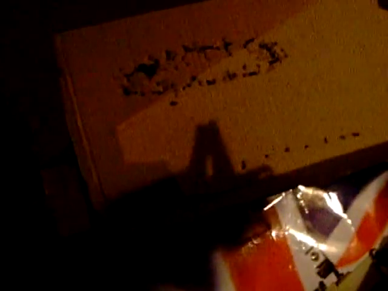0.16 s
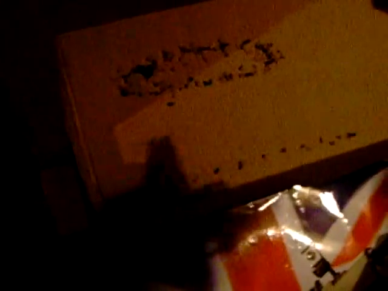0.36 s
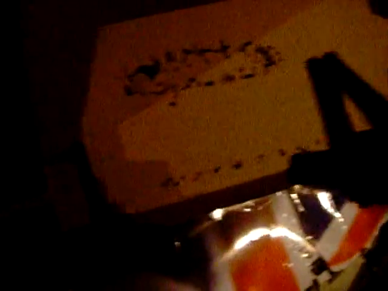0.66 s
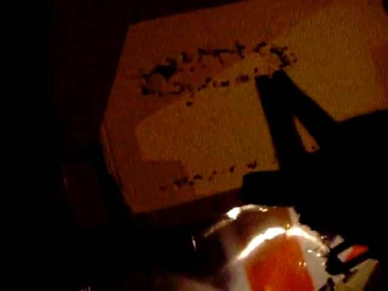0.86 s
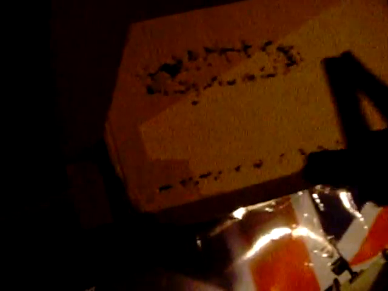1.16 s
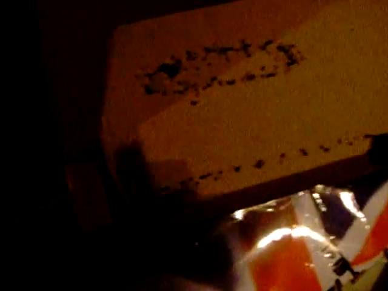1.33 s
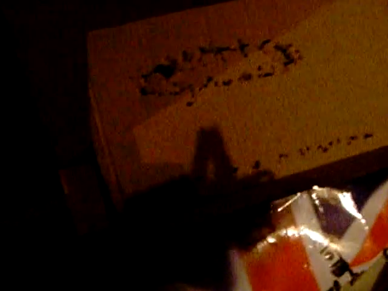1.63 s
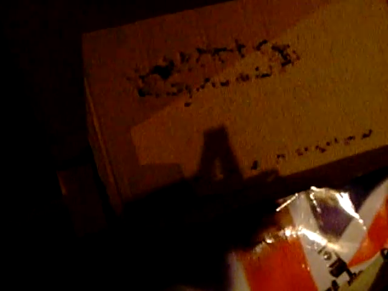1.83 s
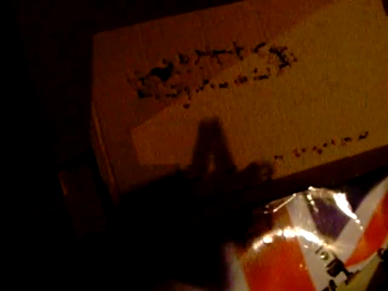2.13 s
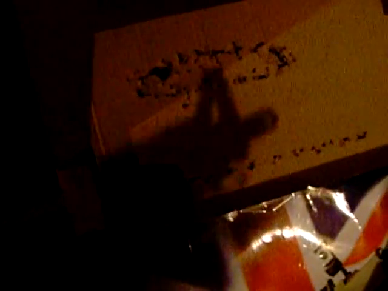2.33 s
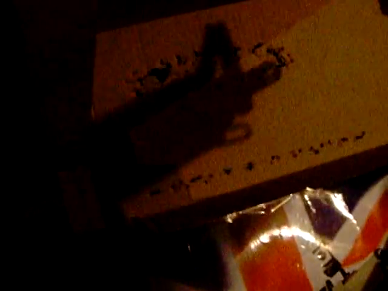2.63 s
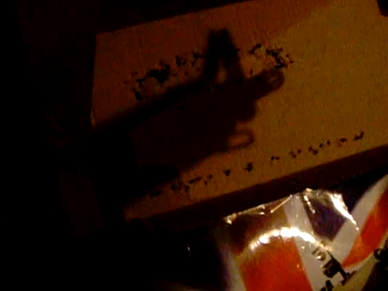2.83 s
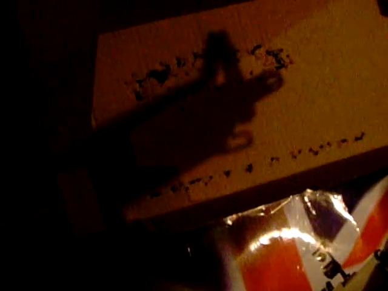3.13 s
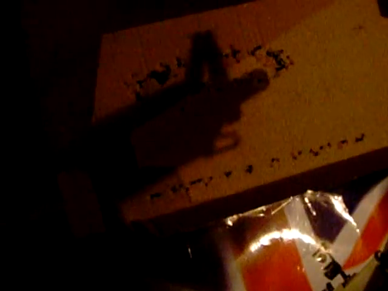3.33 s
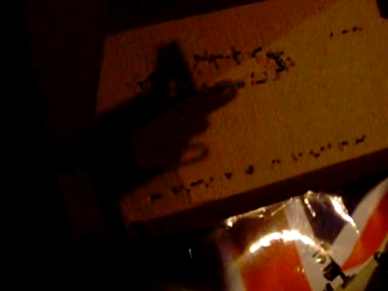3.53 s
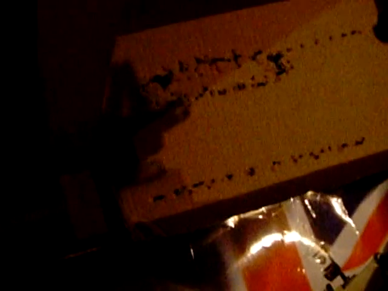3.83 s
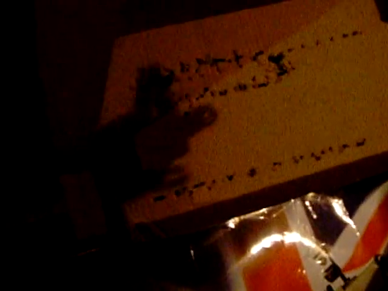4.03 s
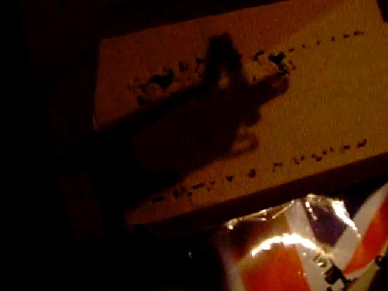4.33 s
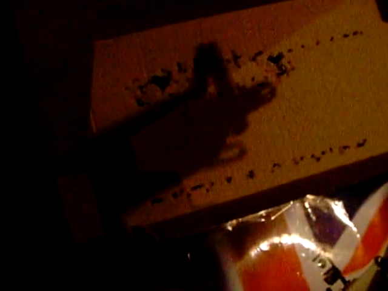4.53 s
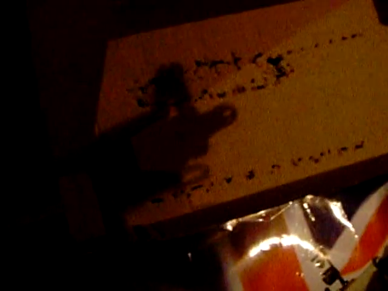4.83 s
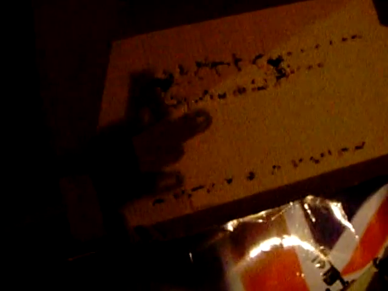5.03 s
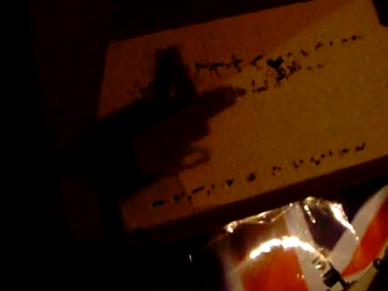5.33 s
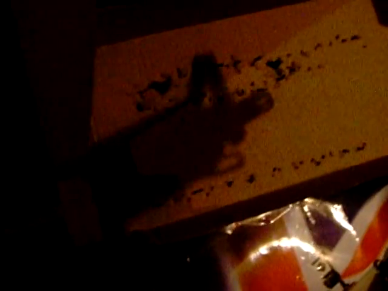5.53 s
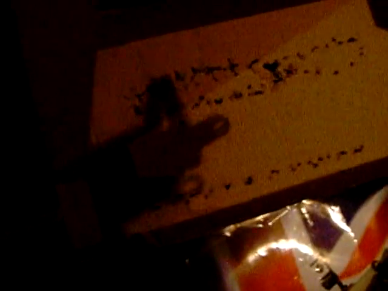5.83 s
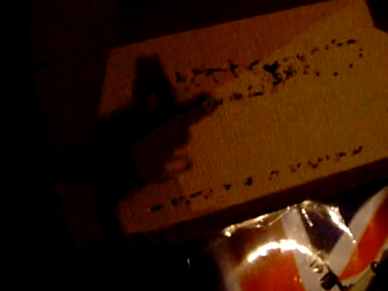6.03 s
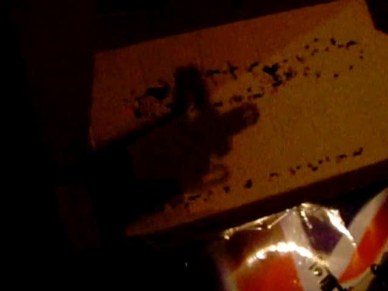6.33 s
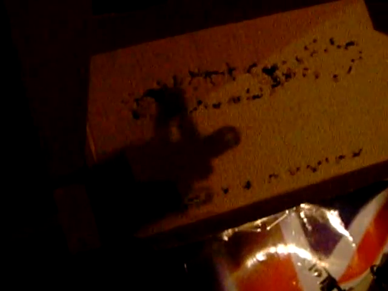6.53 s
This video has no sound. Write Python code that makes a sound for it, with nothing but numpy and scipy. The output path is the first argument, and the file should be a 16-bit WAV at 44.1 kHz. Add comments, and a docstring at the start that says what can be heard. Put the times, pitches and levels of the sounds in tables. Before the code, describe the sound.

In a small room, with the microphone right beside the gun, an electric airsoft rifle is already running. From 0 to about 2.1 seconds it fires steadily, about fourteen shots a second: a continuous raspy gear grind with a slight whine, hard piston clacks, thumping air puffs and pellets smacking a cardboard box, some shots harder than others. The loudness overloads the microphone, adding bright crackly ticks. The motor stops abruptly; a thin, beating metallic spring ring dies away by roughly 2.7, leaving faint room noise, a slight rustle and tiny clicks. At 3.4 a brief squeal starts a second, punchier burst, ending near 4.2. Until 5.0 hands rub the stock and parts click, loudest at 4.23, 4.6 and 5.0. Rising gear squeals then launch the third burst, which slows very slightly and continues to the end at about 6.8 seconds.

```python
"""An electric airsoft rifle, its motor already turning, fires into a cardboard box in a small room, by the
microphone. Gears rasp as a chain of noisy tooth contacts; some 14 times a second air puffs out, the piston
slams and a pellet hits the card, each contact a decaying band of noise. After the first burst the spring rings
on as decaying sines. Hands rustle and parts click, then two more bursts start with gear squeals that follow the
rising tooth rate. A quiet background lies beneath throughout; stray pellets tick short and bright at random,
and the loud bursts overload the microphone."""
import sys
import numpy as np
from scipy import signal
from scipy.fft import rfft, irfft, next_fast_len
from scipy.io import wavfile

SR = 44100
rng = np.random.default_rng(int(sys.argv[2]) if len(sys.argv) > 2 else 0)


def to_wav(s):
    """Save 16-bit WAV."""
    ch = np.atleast_2d(s).T  # columns
    pcm = np.round(np.clip(ch, -1, 1) * 32767)  # PCM
    wavfile.write(sys.argv[1], SR, pcm.astype(np.int16))


N = 294147

# Bursts of fire: trigger pulled t/s, first shot t/s, released t/s, cycle t/s, coasting to -60 dB t/s,
# ordinary blow level/dB, ring of the spring after the last shot level/dB
BURST_TIMES = [(-.2, 0.038, 2.075, .06876, 0.16, -2.6, 4), (3.377, 3.4184, 4.168, .0704, 0.1, -1, -13),
               (5.007, 5.0983, 6.8, .072, .1, -2.5, -7)]


def from_db(db):
    """Level definition: a gain is ten to the power of dB / 20."""
    return 10 ** (np.asarray(db) / 20)


def rms_one(x):
    """Normalisation by mean power: scale to rms 1."""
    return x / np.sqrt(np.mean(x ** 2) + 1e-20)


def decay(t, t60):
    """Exponential damping: the amplitude falls by 60 dB in t60."""
    return np.exp(-np.log(1000) * t / t60)


def lowpass(x, hz, order):
    """Butterworth filtering: only what lies below hz passes freely."""
    return signal.sosfilt(signal.butter(order, hz, fs=SR, output="sos"), x)


def highpass(x, hz):
    """Butterworth filtering: only what lies above hz passes freely."""
    return signal.sosfilt(signal.butter(2, hz, "high", fs=SR, output="sos"), x)


def colour(x, points):
    """Minimum-phase filtering: a folded cepstrum gives a causal response through (f/Hz, level/dB) points."""
    size = 2 * next_fast_len(N)
    hz, db = np.transpose(points)
    bins_hz = np.arange(size // 2 + 1) * SR / size
    gain = from_db(np.interp(np.log(bins_hz + 1), np.log(hz), db))
    cepstrum = irfft(np.log(gain))
    cepstrum[1:size // 2] *= 2
    cepstrum[size // 2 + 1:] = 0
    return irfft(rfft(x, size) * np.exp(rfft(cepstrum)))[:N]


def drift(hz):
    """Band-limited chance: noise below hz with standard deviation 1."""
    return rms_one(lowpass(rng.standard_normal(N + SR), hz, order=2)[SR:])  # without the filter's start


def burst(hz, width_hz, t60, size=8000):
    """Modal overlap: a blow on many close modes sounds as a band of noise that dies away."""
    low = np.sqrt(hz ** 2 + width_hz ** 2 / 4) - width_hz / 2  # hz is the geometric centre
    high = min(low + width_hz, SR / 2 - 100)
    band = signal.butter(2, [low, high], "band", fs=SR, output="sos")
    fade = decay(np.arange(size) / SR, t60)
    ring = signal.sosfilt(band, rng.standard_normal(size) * fade)
    return rms_one(ring) * np.sqrt(np.mean(fade ** 2))


def add(out, s, sound):
    """Superposition: mix a sound in at time s."""
    at = int(np.clip(round(s * SR), 0, N))
    out[at:at + len(sound)] += sound[:N - at]


def shots():
    """Near-periodic firing: a steady cycle falls behind as the battery sags, with chance strengths.

    Each row is a shot: t/s, blow level/dB, puff level/dB."""
    # Shots that stand out, by a hard hit or an air blast that catches the microphone:
    # t/s, blow level/dB, puff level/dB
    hard_shots = [(.312, -6, 4), (.589, -2, 7), (.797, -0.5, 5.5), (1.146, 1, 5), (1.29, 1, 5.5),
                  (1.435, 2.5, 5.5), (2.047, -1, 3), (3.631, 2, -2), (3.702, 5, 9), (3.771, 4.5, 4),
                  (3.84, 2.5, -6), (5.245, 0.5, 7), (5.53, 3.5, 7.5), (5.678, 4, 5), (6.19, 3, 9),
                  (6.414, 2.5, 0)]
    sag_s_per_s4 = .0062  # delay per fourth power of the time spent firing
    blow_spread_db, puff_db, puff_spread_db = 1, -3.5, 2.5  # ordinary shots
    rows = []
    for pulled, first, released, cycle, coast, blow_db, spring_db in BURST_TIMES:
        age = cycle * np.arange(32)
        times = first + age + sag_s_per_s4 * age ** 4
        for s, (blow, puff) in zip(times, rng.standard_normal((32, 2))):
            hard = [levels for at, *levels in hard_shots if abs(at - s) < cycle / 2]
            ordinary = blow_db + blow_spread_db * blow, puff_db + puff_spread_db * puff
            if s < min(released, N / SR):
                rows.append((s, *(hard[0] if hard else ordinary)))
    return np.array(rows)


def motor_db():
    """Rotational inertia: drive builds up after the trigger pull; on release friction stops it, ever faster."""
    spin_up_s = 0.033  # time constant
    now, drive = np.arange(N) / SR, 1e-6
    for pulled, first, released, cycle, coast, *levels in BURST_TIMES:
        run_up = 1 - np.exp(-np.maximum(now - pulled, 0) / spin_up_s)
        late = np.maximum(now - released, 0)
        drive = drive + run_up * decay((late / coast) ** 2, t60=1)
    return 20 * np.log10(drive)


def background():
    """Stationary noise: the quiet room is noise with a fixed spectrum."""
    # Room spectrum, relative: f/Hz, level/dB per Hz
    floor_colour = [(25, 4), (55, 2), (120, 2.5), (200, -2), (600, 1.5), (1000, -6), (2400, -9),
                    (4000, -15), (7500, -28.5), (12000, -49.5)]
    floor_db = -58
    return from_db(floor_db) * rms_one(colour(rng.standard_normal(N), floor_colour))


def gears(fired, level_db, alike, grain_db, clump_db, slack_db, slack_at_s, slack_s,
          whine_db, whine_width_hz, dull_hz, dulling):
    """Contact noise: teeth grind in a partly repeating pattern, and run slack once the piston is let go."""
    # Gear rasp, relative: f/Hz, level/dB per Hz
    rasp_colour = [(30, -20.5), (70, -6), (150, -7.5), (280, -2), (480, 1), (760, 0), (1130, 1), (1550, -2),
                   (2400, -2.5), (3300, -3.5), (4100, -2.5), (5500, -11.5), (7600, -22), (12000, -29)]
    # Gear whine, which slows as the spring is drawn: t/s after the shot, f/Hz
    whine_glide = [(0, 2875), (.025, 2750), (.048, 2400), (.06, 2160), (.08, 2200)]
    shell_hz, shell_q, shell_db = 1120, 10, -6.5  # main resonance of the gearbox shell
    times, now = fired[:, 0], np.arange(N) / SR
    shot = np.maximum(np.searchsorted(times, now) - 1, 0)
    since = now - times[shot]
    period = np.median(np.diff(times))
    speed = period / np.clip(np.diff(times, append=now[-1]), .06, .09)[shot]
    drive_db = motor_db()

    # one row of teeth is replayed every cycle, the other is always new
    teeth = rng.standard_normal((2, N)) * from_db(grain_db * rng.standard_normal((2, N)))
    repeated = teeth[0, (since * speed * SR).astype(int)]
    alike = np.clip(alike, 0, 1)
    rasp = np.sqrt(alike) * repeated + np.sqrt(1 - alike) * teeth[1]
    rasp = colour(rasp * from_db(clump_db * drift(hz=200)), rasp_colour)
    shell = signal.lfilter(*signal.iirpeak(shell_hz, shell_q, fs=SR), rasp)
    rasp = rms_one(rasp + from_db(shell_db) * shell)

    # slow teeth meet softly, so the treble comes last
    dull = lowpass(rasp, dull_hz, order=1)
    rasp = dull + (rasp - dull) * from_db(dulling * np.minimum(drive_db, 0))

    whine_hz = np.interp(since, *np.transpose(whine_glide))
    whine = drift(whine_width_hz) * np.sin(2 * np.pi * np.cumsum(whine_hz) / SR)
    slack = slack_db * np.exp(-((since - slack_at_s) / slack_s) ** 2)
    return from_db(level_db + drive_db + slack) * (rasp + from_db(whine_db) * whine)


def room(x):
    """Diffuse reverberation: dense reflections from near walls decay exponentially."""
    t60 = .31
    t = np.arange(SR // 2) / SR
    tail = rng.standard_normal(len(t)) * decay(t, t60) * (t > .005)
    tail = highpass(tail, 150)
    return signal.fftconvolve(x, tail / np.sqrt(np.sum(tail ** 2)))[:N]


def buffeting(level_db, gust_hz):
    """Turbulent pressure: stirred air keeps rocking the diaphragm while the gun runs at full speed."""
    return from_db(level_db + 2 * motor_db()) * drift(gust_hz)


def ricochets(per_s, level_db, spread_db, hz, width_hz, t60):
    """Ricochets: stray pellets tick short and bright at random while the gun fires."""
    out, drive_db = np.zeros(N), motor_db()
    for at in np.flatnonzero((rng.random(N) < per_s / SR) & (drive_db > -3)):
        gain = from_db(level_db + spread_db * rng.uniform(-1, 1))
        add(out, at / SR, gain * burst(hz, width_hz, t60))
    return out


def puffs(fired, push_db, push_s, push_spread, thump_db, thump_hz, thump_width_hz, thump_t60):
    """Air displacement: muzzle air gives the diaphragm a slow push and a low thump."""
    out, t = np.zeros(N), np.arange(SR // 6) / SR
    push = (t / push_s) ** 2 * np.exp(2 - 2 * t / push_s)  # peaks at 1 after push_s
    for s, blow_db, puff_db in fired:
        add(out, s - .006, -from_db(push_db + push_spread * puff_db) * push)
        thump = burst(thump_hz, thump_width_hz, thump_t60)
        add(out, s - .003, from_db(thump_db + puff_db) * thump)
    return out


def blows(fired, level_db, alike):
    """Impact excitation: every cycle repeats the same contacts, each ringing partly as before, partly anew."""
    # Contacts of one firing cycle, in turn: piston slips off the gear (2 rows), slams into the
    # cylinder head (2), pellet hits the cardboard (2), nozzle springs back, gear catches the piston (2):
    # t/s after the shot, f/Hz, width f/Hz, relative level/dB, t60/s
    contacts = [(-.003, 3400, 761, -4.5, 0.023), (-.003, 4800, 1598, -13.5, 0.033),
                (.002, 1150, 350, 0.5, 0.019), (.002, 540, 260, -1.5, 0.028), (.014, 820, 596, -2.5, .07),
                (0.022, 400, 300, -11, .08), (.029, 1130, 450, -10.5, .05), (.045, 2300, 800, -6, 0.015),
                (.056, 520, 299.3, -6.5, 0.025)]
    out, alike = np.zeros(N), np.clip(alike, 0, 1)
    for delay, hz, width_hz, db, t60 in contacts:
        usual = burst(hz, width_hz, t60)
        for s, blow_db, puff_db in fired:
            ring = np.sqrt(alike) * usual + np.sqrt(1 - alike) * burst(hz, width_hz, t60)
            add(out, s + delay, from_db(level_db + db + blow_db) * ring)
    return out


def spring(fired):
    """Modal decay: each release rings the spring; left free, it later settles against its damping guide."""
    # Spring modes, with close pairs that beat: f/Hz, relative level/dB, t60/s
    modes = [(921, -55, .9), (1171, -37, .8), (1180, -47, .6), (1448, -39, .6), (1492, -42, .6),
             (2037, -43, .7), (2347, -46, 1.25), (3214, -51, .7), (3838, -51, .85), (3870, -51, .85)]
    firing_db = -3.5  # ring between shots
    shimmer_db = -47  # the many weak modes
    free_s, settle_t60 = 0.38, .16
    out, t = np.zeros(N), np.arange(SR) / SR
    ring = sum(from_db(db) * np.sin(2 * np.pi * hz * t) * decay(t, t60) for hz, db, t60 in modes)
    ring = ring + from_db(shimmer_db) * burst(hz=2300, width_hz=3000, t60=0.7, size=SR)
    ring = ring * decay(np.maximum(t - free_s, 0), settle_t60)
    times = fired[:, 0]
    last_db = {times[times < released].max(): spring_db
               for pulled, first, released, *others, spring_db in BURST_TIMES}
    for s in times:
        at = int(s * SR)
        # cocking stops the previous ring, so it is replaced
        out[at:at + SR] = from_db(last_db.get(s, firing_db)) * ring[:N - at]
    return out


def handling(relative_width=0.27, lumpy_db=3.0, lumps_hz=45, tick_db=-8):
    """Friction and impact: hands rub unevenly on the stock and loose parts click; soft contacts lose their tick."""
    # Hands rubbing on the stock: start t/s, end t/s, level/dB
    rubs = [(2.559, 3.351, -67), (2.65, 2.758, -56.5), (4.217, 4.676, -45), (4.685, 4.87, -49.5),
            (4.913, 5.05, -52.5)]
    # Rustle of the hands, relative: f/Hz, level/dB per Hz
    rustle_colour = [(30, -14.5), (110, -7), (250, 3.5), (480, 8), (780, 2.5), (950, 1), (1250, -4),
                     (2000, -14), (2380, -4), (2800, -14.5), (3700, -14.5), (6000, -28), (12000, -54)]
    # Clicks of the trigger, latch and loose parts: t/s, own pitch f/Hz, body level/dB, pitch level/dB,
    # treble level/dB, t60/s, rise t/s
    clicks = [(2.582, 3220, -68, -53, -95, .07, .002), (3.25, 2600, -58, -57, -72, .05, .001),
              (4.233, 1150, -15.5, -13, -56, 0.033, 0.0013), (4.295, 1540, -53, -44, -48, .067, .004),
              (4.307, 6000, -41, -40, -55, .01, .0002), (4.4, 1090, -45, -35, -79, .064, .0003),
              (4.464, 2400, -46, -55, -76, .075, .001), (4.517, 1650, -35, -34, -75, 0.11, .0007),
              (4.606, 2580, -23, -32, -46, .12, 0.0067), (4.685, 1220, -38, -37, -74, .05, .0004),
              (4.703, 3350, -44, -40, -81, .1, .002), (4.785, 1900, -45.5, -43, -86, 0.074, .0004),
              (4.854, 1230, -51, -44, -63, .12, .0007), (4.919, 1425, -45, -42, -77, .04, .001),
              (4.957, 2530, -47, -43, -81, 0.14, 0.0017), (5.012, 620, -21, -17.5, -54, .13, .0015)]
    attack_s, release_s = 0.0052, 0.03
    now = np.arange(N) / SR
    rub = np.zeros(N)
    for start, end, db in rubs:
        rise = 1 - np.exp(-np.maximum(now - start, 0) / attack_s)
        fall = np.exp(-np.maximum(now - end, 0) / release_s)
        rub += from_db(db) * rise * fall
    rustle = rms_one(colour(rng.standard_normal(N), rustle_colour))
    out = rub * from_db(lumpy_db * drift(lumps_hz)) * rustle
    for s, hz, body_db, pitch_db, treble_db, t60, rise_s in clicks:
        tick = burst(hz=6000, width_hz=2500, t60=0.0062)
        body = burst(hz=1500, width_hz=2100, t60=t60) + from_db(tick_db) * tick
        click = from_db(body_db) * body
        click = click + from_db(pitch_db) * burst(hz, relative_width * hz, t60)
        click = click + from_db(treble_db) * burst(hz=4800, width_hz=15700, t60=t60)
        add(out, s, click * (1 - np.exp(-np.arange(len(click)) / SR / rise_s)))
    return out


def squeals(rough=0.29, rough_hz=250):
    """Harmonic tooth-mesh tones: gears squeal briefly on multiples of a tooth rate that climbs with the motor."""
    # Squeals under the load of starting: t/s, length t/s, multiple of the tooth rate, relative level/dB
    squeal_rows = [(3.412, 0.03, 2, -13), (3.448, .04, 3, -14), (5.02, .024, 1, -12),
                   (5.045, 0.013, 2, -3.5), (5.068, .016, 2, -5)]
    start_hz, top_hz, rise_s = 579, 736, .055  # tooth rate on the first draw
    now, pulls = np.arange(N) / SR, np.array(BURST_TIMES)[:, 0]
    age = now - pulls[np.searchsorted(pulls, now) - 1]
    hz = top_hz + (start_hz - top_hz) * np.exp(-(age / rise_s) ** 2)
    phase = 2 * np.pi * np.cumsum(hz) / SR
    squeal = np.zeros(N)
    for s, length, multiple, db in squeal_rows:
        swell = np.exp(-(2 * (now - s) / length) ** 2)
        squeal += from_db(db) * swell * np.sin(round(multiple) * phase)
    return squeal * from_db(motor_db()) * (1 + rough * drift(rough_hz))


def scene():
    """Superposition of direct and reverberant sound: gun and box in the room, over a quiet background."""
    room_db = -16.5
    fired = shots()
    gun = gears(fired, level_db=-12, alike=0.15, grain_db=4.5, clump_db=1.0,
                slack_db=-1, slack_at_s=0.013, slack_s=0.014,
                whine_db=-16.5, whine_width_hz=120, dull_hz=2200, dulling=0.43)
    gun = gun + ricochets(per_s=14, level_db=-15, spread_db=3.5, hz=7240, width_hz=3200, t60=0.0019)
    gun = gun + blows(fired, level_db=-7, alike=0.25) + handling() + squeals()
    air = buffeting(level_db=-16.5, gust_hz=11)
    air = air + puffs(fired, push_db=-11.0, push_s=0.019, push_spread=1.6,
                      thump_db=-17.5, thump_hz=185, thump_width_hz=220, thump_t60=.09)
    # the slow air push does not travel, so air stays out of the reverberation
    return (gun + from_db(room_db) * room(gun) + spring(fired) + air + background())[None]


def record(dry, travel=1.21, bass_cut_hz=55):
    """Nonlinear overload: the port resonates, the diaphragm saturates, bass is cut and the amplifier clips."""
    # Microphone with its port resonance: f/Hz, level/dB
    mic_response = [(20, -2), (7500, -0.5), (9200, 1.5), (10000, 17), (10700, 25), (11400, 18.5),
                    (12200, -13)]
    clip_level, cutoff_hz = .7, 12242
    x = travel * np.tanh(colour(dry[0], mic_response) / travel)
    x = highpass(x, bass_cut_hz)
    x = x / (1 + (x / clip_level) ** 8) ** (1 / 8)
    treble_cut = signal.firwin(255, cutoff_hz, fs=SR, window="blackman")
    return signal.fftconvolve(x, treble_cut, "same")[None]


dry = scene()
out = record(dry)
to_wav(out)
```